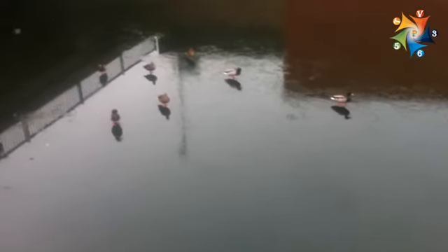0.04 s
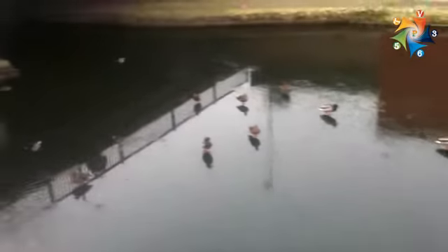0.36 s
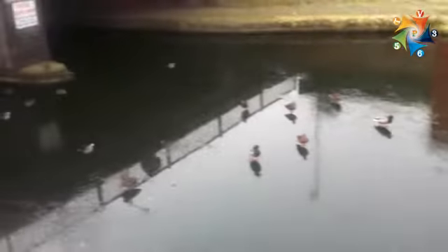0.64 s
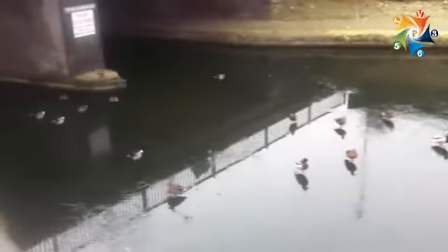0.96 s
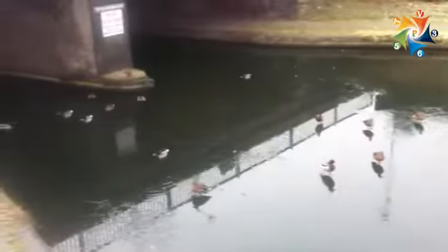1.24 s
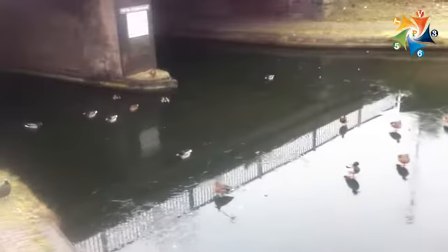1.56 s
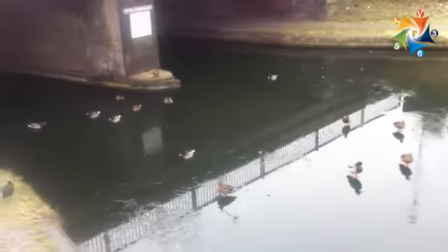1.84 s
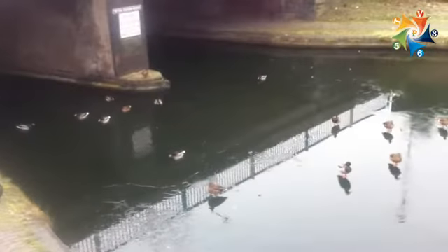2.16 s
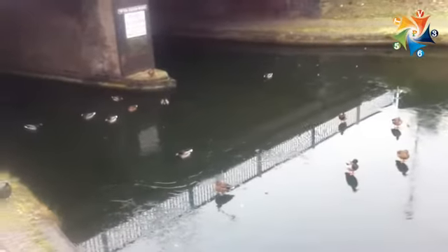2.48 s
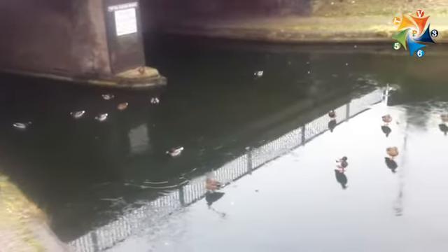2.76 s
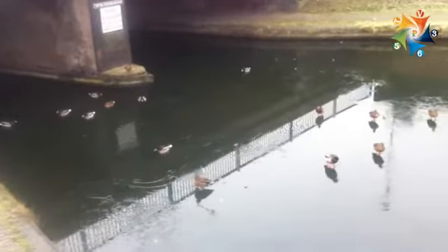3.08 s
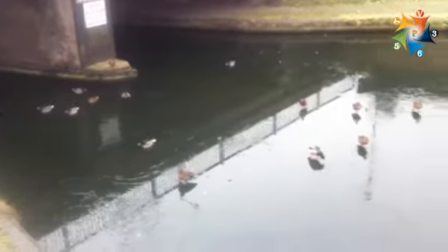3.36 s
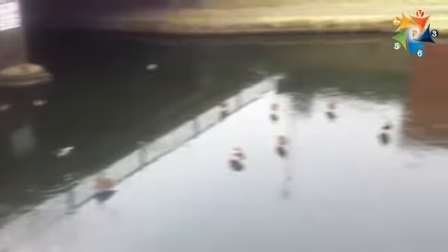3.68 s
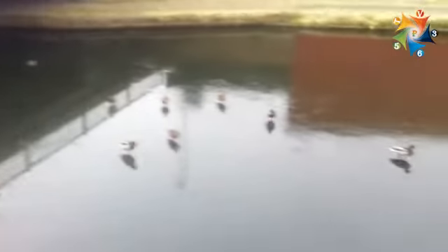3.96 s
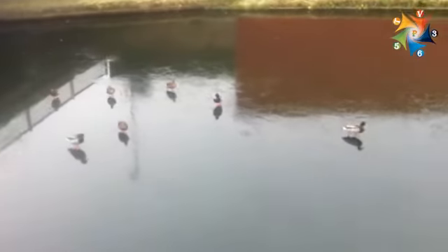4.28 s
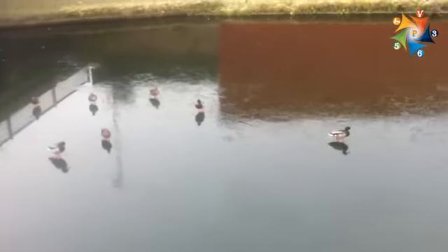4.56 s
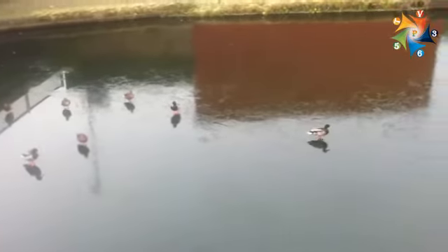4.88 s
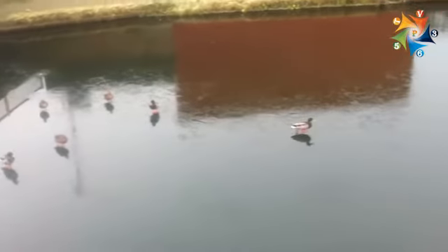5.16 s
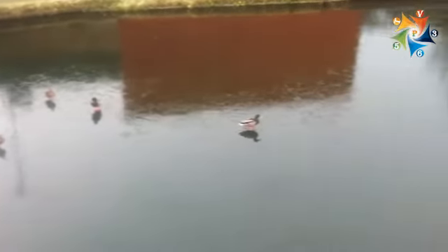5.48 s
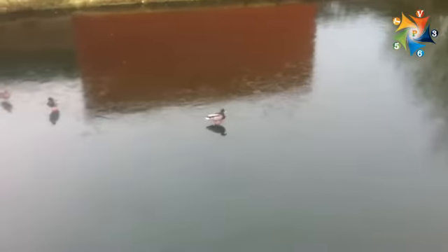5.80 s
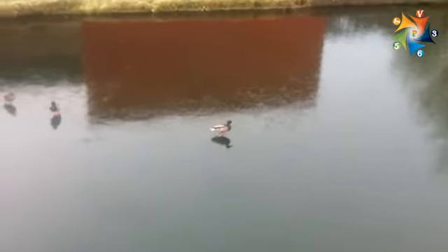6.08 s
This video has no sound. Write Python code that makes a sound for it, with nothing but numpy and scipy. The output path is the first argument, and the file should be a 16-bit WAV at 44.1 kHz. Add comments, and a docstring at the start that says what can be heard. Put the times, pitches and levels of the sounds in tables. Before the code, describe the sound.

A duck quacks briefly five times across a pond, all in the second half, while gusty wind rumbles and thumps on the microphone. Before that comes a short bright rustle with dry clicks, followed by the first soft gusts. Faint high chirps of small birds and the low, steady hum of a far-off town lie underneath. The wind eases for a moment, then buffets again at the end.

```python
"""A duck pond in a gusty breeze. Far-off town noise and moving air make a steady wash, and wind
bumps the microphone in soft, low thumps. A bright, crackly rustle with dry ticks fills the first
second, then sinks to a faint hiss. Small birds chip and twitter faintly. In the second half a duck
gives five short, nasal quacks: pulses from its voice box, shaped by its throat and bill."""
import sys
import numpy as np
from scipy import signal
from scipy.fft import rfft, irfft, next_fast_len
from scipy.io import wavfile
from scipy.ndimage import uniform_filter1d

SR = 44100
rng = np.random.default_rng(int(sys.argv[2]) if len(sys.argv) > 2 else 0)


def to_wav(s):
    """Save 16-bit WAV."""
    ch = np.atleast_2d(s).T  # columns
    pcm = np.round(np.clip(ch, -1, 1) * 32767)  # PCM
    wavfile.write(sys.argv[1], SR, pcm.astype(np.int16))


N = 279285
TIME = np.arange(N) / SR


def gain_of(db):
    """Turns decibels into a number to multiply a sound by."""
    return 10 ** (np.asarray(db) / 20)


def evened(x):
    """Scales a signal to an average strength (rms) of 1."""
    return x / np.sqrt(np.mean(x ** 2) + 1e-20)


def gain_at(colour, hz):
    """Looks up the gain at hz in a colour: a table of how strong each frequency is."""
    table_hz, db = np.transpose(colour)
    return gain_of(np.interp(np.log(hz + 1), np.log(table_hz + 1), db))


def follow(rows, t):
    """Reads a table at the times t, sliding from row to row."""
    time_s, *columns = np.transpose(rows)
    return [np.interp(t, time_s, column) for column in columns]


def coloured(x, colour):
    """Filters x with a colour; the result has strength 1."""
    size = next_fast_len(len(x))
    spectrum = rfft(x, size) * gain_at(colour, np.fft.rfftfreq(size, 1 / SR))
    return evened(irfft(spectrum, size)[:len(x)])


def noise(colour, size=N):
    """Noise of the given colour, at strength 1."""
    return coloured(rng.standard_normal(size), colour)


def flutter(hz, size=N):
    """A random wobble that changes about hz times a second."""
    return evened(np.interp(TIME[:size] * hz, np.arange(size), rng.standard_normal(size)))


def flare(t, rise_s, fall_s):
    """Grows to 1 at t = 0, then dies away."""
    return np.exp(-np.maximum(-t / rise_s, t / fall_s))


def add(mix, start_s, sound):
    """Mixes a sound in at start_s."""
    part = mix[max(round(start_s * SR), 0):][:len(sound)]
    part += sound[:len(part)]


# The tone of far-off traffic: frequency_hz, level_db
TRAFFIC_COLOUR = [(20, -55), (60, -34), (110, -8.5), (160, 0.5), (220, 1.5), (330, -6.5), (450, -15.5),
                  (1000, -25), (3000, -75.5)]
def traffic(level_db=-46.5):
    """Traffic in the town blurs into one low, steady rumble."""
    return gain_of(level_db) * noise(TRAFFIC_COLOUR)


# How loud the wash is and how high it reaches: time_s, level_db, upper_edge_hz
WASH_CURVE = [(0, -47.5, 2340), (.5, -44.5, 2530), (2.2, -43.5, 2390), (2.7, -42.5, 2500), (3.7, -43, 2500),
              (4.0, -38.5, 2820), (4.35, -39, 2850), (5.05, -45.5, 3070), (5.6, -44, 3160),
              (6.33, -38, 3400)]
# The tone of the wash before its top is cut off: frequency_hz, level_db
WASH_COLOUR = [(60, -29), (250, -8), (480, 1.5), (630, 6), (900, 4.5), (1200, 3), (1700, 4.5), (2200, -0.5),
               (3000, -5), (6000, -2)]
def distant_wash(patchy_db=1.2):
    """Far noise of town and air that slowly grows brighter toward the end."""
    hz, t, spectra = signal.stft(rng.standard_normal(N), SR, nperseg=1024, noverlap=768)
    _, edge_hz = follow(WASH_CURVE, t)
    tone = gain_at(WASH_COLOUR, hz)[:, None] / np.sqrt(1 + (hz[:, None] / edge_hz) ** 14)
    # random louder and softer patches, smoothed over pitch and then over time
    patches = uniform_filter1d(rng.standard_normal(spectra.shape), size=7, axis=0)
    patches = evened(uniform_filter1d(patches, size=14, axis=1))
    _, air = signal.istft(spectra * tone * gain_of(patchy_db * patches), nperseg=1024, noverlap=768)
    level_db, _ = follow(WASH_CURVE, TIME)
    return gain_of(level_db) * evened(air[:N])


# The tone of the light breeze: frequency_hz, level_db
BREEZE_COLOUR = [(20, -30), (45, -18.5), (80, -11.5), (135, -2), (200, -4.5), (350, -23), (1000, -48),
                 (3000, -80)]
def breeze(start_s=0.91, rise_s=0.16, level_db=-46.5, waver_db=2.4):
    """Slow air turns over slowly: a faint, wavering rumble, deeper than the gusts."""
    fade_in = np.clip((TIME - start_s) / rise_s, 0, 1)
    return fade_in * gain_of(level_db + waver_db * flutter(hz=12)) * noise(BREEZE_COLOUR)


# How loud the rustle is, apart from its one swish: time_s, level_db
RUSTLE_CURVE = [(0, -49.5), (.06, -44.5), (1.03, -46), (1.11, -51), (2.0, -56.5), (5.0, -57), (6.0, -52),
                (6.33, -48.5)]
# The tone of its hiss: frequency_hz, level_db
HISS_COLOUR = [(60, -21), (250, 16.5), (1000, 6.5), (2500, 6.5), (3500, 6), (4600, 3.5), (5700, 2),
               (6900, -2), (8800, -0.5), (10700, -1.5), (13000, -6), (16000, -8.5)]
def rustle(swish_at_s=4.17, swish_db=6, flicker_db=0.77, snaps_per_s=30, snap_decay_s=0.0013):
    """Bright hiss with tiny snaps at four pitches; the louder it is, the more it crackles."""
    level_db, = follow(RUSTLE_CURVE, TIME)
    level_db += swish_db * flare(TIME - swish_at_s, rise_s=0.037, fall_s=0.11)
    hiss = noise(HISS_COLOUR) * gain_of(flicker_db * flutter(hz=60))
    crackle = np.zeros(N)
    for hz in (3500, 5200, 7500, 10500):
        snaps = rng.uniform(0, 1, N) * (rng.random(N) < snaps_per_s / SR)
        bursts = signal.lfilter([1], [1, -np.exp(-1 / (snap_decay_s * SR))], snaps)
        crackle += bursts * noise([(hz / 2, -20), (hz, 0), (hz * 2, -20)])
    crackle_share = gain_of(-11 + 0.98 * (level_db - level_db.max()))
    return gain_of(level_db) * (hiss + crackle_share * evened(crackle))


# Dry ticks, then fainter high ones: start_s, peak_db
DRY_TICKS = [(0.042, -34), (.055, -43), (.209, -30.5), (.303, -30.5), (0.3518, -35), (.371, -29),
             (0.435, -39), (.447, -34), (0.5275, -29.5), (.536, -36), (.564, -36), (0.625, -25),
             (0.6363, -26.5), (.768, -34), (0.9783, -33.5), (1.015, -34), (3.052, -37), (4.175, -34)]
HIGH_TICKS = [(1.7394, -41.5), (1.7659, -44), (1.8527, -40.5), (4.6623, -41), (5.1831, -49.5),
              (5.3293, -41)]
# The tone of each kind: frequency_hz, level_db
DRY_COLOUR = [(300, -38), (1500, -2.5), (2700, -1), (4200, -8), (5600, -7), (7500, -16), (10500, -6.5),
              (13000, -32), (16000, -24)]
HIGH_COLOUR = [(3000, -14), (8000, -6), (11000, 0), (13000, -11), (16000, -11)]
def ticks(dry_decay_s=0.0038, high_decay_s=0.0018):
    """Each tick is a puff of noise that dies within milliseconds."""
    t, out = TIME[:SR // 20], np.zeros(N)
    kinds = (DRY_TICKS, DRY_COLOUR, dry_decay_s), (HIGH_TICKS, HIGH_COLOUR, high_decay_s)
    for rows, colour, decay_s in kinds:
        for start_s, peak_db in rows:
            tick = noise(colour, len(t)) * np.exp(-t / decay_s)
            add(out, start_s, gain_of(peak_db) * tick / abs(tick).max())
    return out


# Gusts, with short hard ones riding on long soft ones: start_s, length_s, level_db
GUSTS = [(1.194, 0.068, -31), (1.3, 0.021, -37.5), (2.026, 0.095, -32), (2.417, 0.914, -35.5),
         (2.478, 0.024, -28.5), (2.546, 0.1, -25.5), (2.69, 0.016, -28), (2.725, 0.14, -27),
         (2.967, 0.12, -21), (3.007, 0.061, -19.5), (3.165, 0.078, -26.5), (3.436, 0.034, -23),
         (3.568, 0.17, -27.5), (3.782, 0.12, -27), (3.997, 0.711, -32), (4.026, 0.11, -22.5),
         (4.285, 0.021, -23.5), (4.512, 0.036, -24), (4.9, 0.113, -40), (5.129, 0.1, -35.5),
         (5.646, 0.032, -37), (5.777, 0.031, -37.5), (5.844, 0.071, -24.5), (6.116, 0.32, -31.5)]
def wind_strength_db(hard_eddies, calm_db=-68, attack_s=0.0096, release_s=0.016, wake_db=-15):
    """Gusts rise fast, hold and fade; each hard eddy (a swirl of air) drags a short wake."""
    power = gain_of(calm_db) ** 2
    for start_s, length_s, level_db in GUSTS:
        attack = np.clip((TIME - start_s) / attack_s, 0, 1)
        release = np.exp(-np.maximum(TIME - start_s - length_s, 0) / release_s)
        power = power + (gain_of(level_db) * attack * release) ** 2
    t = TIME[:SR // 5] - .1
    wake = flare(t, rise_s=0.008, fall_s=0.014)
    for time_s, peak_db, _ in hard_eddies:
        add(power, time_s + t[0], (gain_of(peak_db + wake_db) * wake) ** 2)
    return 10 * np.log10(power)


# The tones of soft wind and of hard gusts: frequency_hz, level_db
SOFT_COLOUR = [(20, -60), (45, -45), (80, -8.5), (125, -2), (175, 1.5), (250, -2), (400, -14.5), (600, -24),
               (1000, -50), (2000, -38.5), (5000, -93)]
HARD_COLOUR = [(40, -50), (150, -23), (400, 9.5), (950, -4.5), (1400, -13), (2500, -41.5), (6000, -50)]
def turbulence(wind_db, hard_at_db=-15, lumpy_db=2, mic_low_cut_hz=84.5):
    """Low churning air on the microphone; only the strongest gusts reach higher in pitch."""
    hard_share = gain_of(-6 + 1.67 * np.minimum(wind_db - hard_at_db, 0))
    churn = noise(SOFT_COLOUR) + hard_share * noise(HARD_COLOUR)
    # even out the churn, so that the gusts set its rise and fall
    power = abs(uniform_filter1d(churn ** 2, size=900)) + 1e-6
    gusting = gain_of(wind_db + lumpy_db * flutter(hz=90)) * evened(churn / power ** .4)
    low_cut = signal.butter(2, mic_low_cut_hz, "high", fs=SR, output="sos")
    return signal.sosfiltfilt(low_cut, gusting)


def small_eddies(wind_db, per_s=12, over_wind_db=3.5, scatter_db=2, scatter_octaves=0.27):
    """Rows for weaker eddies that come by chance, peaking just over the wind that carries them."""
    at = np.flatnonzero(rng.random(N) < per_s / SR)
    strength, pitch = rng.standard_normal((N, 2))[at].T
    peak_db = wind_db[at] + over_wind_db + scatter_db * strength
    pitch_hz = 250 * 2 ** (scatter_octaves * pitch)
    return list(zip(TIME[at], peak_db, pitch_hz))


def eddy_thumps(rows, low_cut_hz=155, size=4096):
    """An eddy pushes, then sucks; with its deep bass cut off it swings two or three times."""
    hz = np.fft.rfftfreq(size, 1 / SR)
    low_cut = 1 / np.sqrt(1 + (low_cut_hz / (hz + 1)) ** 10)
    out = np.zeros(N)
    for time_s, peak_db, pitch_hz in rows:
        reach_hz = max(2.22 * (pitch_hz - 110), 40)  # small eddies pass faster and reach higher
        spectrum = low_cut * np.exp(-(hz / reach_hz) ** 1.75)
        swing = np.fft.fftshift(irfft(1j * spectrum))  # 1j turns a bump into a push and a pull
        add(out, time_s - size / 2 / SR, gain_of(peak_db) * swing / abs(swing).max())
    return out


# The hardest swirls of air that hit the microphone: time_s, peak_db, rough_pitch_hz
HARD_EDDIES = [(1.906, -24, 207), (2.043, -10, 324), (2.082, -15.5, 190), (2.519, -15, 220),
               (2.554, -14.5, 260), (2.565, -18, 300), (2.575, -18, 328), (2.611, -15, 216),
               (2.802, -19.5, 397), (2.85, -21, 190), (2.887, -15.5, 454), (2.894, -8, 290),
               (2.939, -21, 318), (2.982, -15, 318), (3.026, -18, 430), (3.039, -9, 275),
               (3.047, -8.5, 420), (3.058, -6.5, 250), (3.062, -17, 620), (3.086, -8, 320),
               (3.238, -14.5, 236), (3.29, -16.5, 257), (3.371, -17.5, 260), (3.606, -12.5, 298),
               (3.612, -12.5, 286), (3.655, -12.5, 285), (3.709, -12.5, 205), (3.803, -15.5, 265),
               (3.814, -13.5, 323), (3.825, -11.5, 350), (3.858, -15, 260), (3.885, -16.5, 322),
               (3.901, -19, 250), (4.053, -17, 200), (4.113, -11.5, 247), (4.124, -11, 240),
               (4.198, -8.5, 310), (4.205, -14, 440), (4.298, -9, 230), (4.313, -13.5, 283),
               (4.363, -18, 285), (4.401, -24, 310), (4.431, -20.5, 390), (4.458, -10.5, 248),
               (4.491, -20, 310), (4.525, -13, 216), (4.542, -17, 225), (4.633, -11, 298),
               (4.688, -22.5, 270), (5.233, -25, 224), (5.855, -8.5, 285), (5.883, -7.5, 214),
               (6.094, -12, 250), (6.122, -5.5, 236), (6.157, -13.5, 234), (6.2, -11.5, 213),
               (6.211, -9, 212), (6.245, -11, 237), (6.254, -11, 219), (6.286, -9, 255), (6.316, -3, 300)]
def wind():
    """Gusts churn over the microphone while eddies thump against it."""
    wind_db = wind_strength_db(HARD_EDDIES)
    return turbulence(wind_db) + eddy_thumps(HARD_EDDIES + small_eddies(wind_db))


def far_flock(per_s=22, length_s=0.0165, fuzz=0.64, scatter_octaves=0.0705):
    """Rows like those of CHIPS below, for a far-off flock that twitters by chance."""
    starts_s = TIME[rng.random(N) < per_s / SR]
    scatter_db, pitch = rng.standard_normal((N, 2))[:len(starts_s)].T
    end_hz = 5650 * 2 ** (scatter_octaves * pitch)
    return [(start_s, db, hz * 1.122, hz, length_s, fuzz)
            for start_s, db, hz in zip(starts_s, -63 + scatter_db, end_hz)]


# Thin calls of small birds: start_s, peak_db, start_hz, end_hz, length_s, fuzz (0 to 1)
CHIPS = [(.142, -47, 7400, 5500, .01, .5), (1.366, -50, 4500, 3700, .012, .8),
         (1.473, -50, 4660, 3960, 0.022, 0.8), (1.543, -51, 4000, 3570, 0.023, 0.5),
         (1.581, -53, 6800, 5560, .014, 0.7), (1.814, -54, 8300, 6400, .01, .7),
         (1.846, -52, 7170, 5880, .012, 0.69), (2.072, -52, 6900, 5540, .013, 0.76),
         (2.493, -51, 6430, 5300, 0.01, .6), (3.039, -51, 10500, 7500, .007, .4),
         (3.044, -44, 9740, 5250, 0.011, 0.6), (3.069, -51, 6600, 6000, .007, .3),
         (3.25, -54, 10000, 8900, 0.0071, .3), (3.347, -52, 6400, 5500, .009, .6),
         (4.048, -55, 9300, 7500, .008, .4), (4.07, -55, 7300, 6200, .008, .3),
         (4.128, -48, 8250, 5600, 0.012, 0.3), (5.035, -57, 7200, 6660, 0.0406, 0.5)]
def small_birds():
    """Each chip is a tiny, unsteady whistle that drops fast and levels out."""
    out = np.zeros(N)
    for start_s, peak_db, start_hz, end_hz, length_s, fuzz in CHIPS + far_flock():
        progress = np.linspace(0, 1, round(length_s * SR))
        hz = end_hz + (start_hz - end_hz) * (1 - progress) ** 1.61
        hz *= 1 + .13 * fuzz * flutter(hz=3000, size=len(hz))
        whistle = np.sin(2 * np.pi * np.cumsum(hz) / SR)
        add(out, start_s, gain_of(peak_db) * np.sin(np.pi * progress) * whistle)
    return out


# The tones of the duck's throat and of its raspy breath: frequency_hz, level_db
THROAT_COLOUR = [(720, 5), (1440, 4), (2160, -8), (2880, -10.5), (4300, -16), (5000, -18.5), (5700, -24),
                 (7200, -24), (8500, -23.5), (10000, -31), (15000, -41)]
BREATH_COLOUR = [(400, -20), (1500, 3), (3800, -3), (5500, -11.5), (7000, -14), (8600, -4.5), (12000, -11),
                 (16000, -20)]
def quack(length_s, pitch_hz, rise, level_db, bill_hz, bill_boost_db, nasal_db, rasp):
    """A short run of voice-box pulses rings in the throat and bill; hoarse calls waver more."""
    bill_width_octaves, shimmer_db, breath_db = .42, 2.5, -8
    position = np.linspace(-1, 1, round(length_s * SR))  # -1 at the start, 1 at the end
    size = len(position)
    arch = .012 * (1 / 3 - position ** 2)
    jitter = .04 * rasp * flutter(hz=540)[:size]
    phase = 2 * np.pi * np.cumsum(pitch_hz * (1 + rise * position / 2 + arch + jitter)) / SR
    harmonic = np.arange(1, 21)[:, None]  # whole multiples of the pitch
    octaves_from_bill = np.log2(harmonic * pitch_hz / bill_hz)
    bill_db = bill_boost_db * np.exp(-.5 * (octaves_from_bill / bill_width_octaves) ** 2)
    boost_db = bill_db + nasal_db * (harmonic == 2)
    start_phase, drift = rng.uniform(0, 2 * np.pi, (2, len(harmonic), 1))
    shift_db = shimmer_db * np.sin(np.pi * position + drift)  # the moving bill shifts the tone
    weights = gain_at(THROAT_COLOUR, harmonic * pitch_hz) * gain_of(boost_db + shift_db)
    voice = evened((weights * np.cos(harmonic * phase + start_phase)).sum(0))
    voice *= 1 + .5 * rasp * flutter(hz=410)[:size]  # a hoarse call has uneven pulses
    breath = coloured(rng.standard_normal(size) * (1 + np.cos(phase)), BREATH_COLOUR)  # a puff a pulse
    breath *= gain_of(breath_db) * rasp * (1 - position / 2)  # most at the start
    return gain_of(level_db) * (voice + breath) * (1 - position ** 4)


# The duck's calls: start_s, length_s, pitch_hz, rise (share of the pitch), level_db,
# bill_hz, bill_boost_db, nasal_db, rasp (0 to 1)
QUACKS = [(3.740, .029, 718, .012, -32.5, 4100, 8, 3, .16),
          (4.722, .037, 709, .012, -36, 6200, 11.5, -5, .08),
          (5.396, .027, 720, .008, -32, 5000, 3.5, -1, .13),
          (6.109, .04, 730, .045, -30, 2250, 10, 1.5, .42), (6.147, .055, 706, .055, -33, 2000, 6, -1, .42)]
def duck():
    """Five quacks across the water; the last two run together."""
    out = np.zeros(N)
    for start_s, *call in QUACKS:
        add(out, start_s, quack(*call))
    return out


def bank_echoes(sound, delay_s=.012, fade_s=.35, level_db=-16):
    """Faint, scattered echoes from the banks and the bridge."""
    t = TIME[:SR // 2]
    echoes = rng.standard_normal(len(t)) * (rng.random(len(t)) < 1 / 20)
    echoes *= (t > delay_s) * gain_of(-60 * t / fade_s)
    return gain_of(level_db) * signal.fftconvolve(sound, echoes / np.linalg.norm(echoes))[:N]


def scene():
    """Everything that reaches the one microphone; only the birds echo."""
    background = traffic() + distant_wash() + breeze() + rustle() + ticks() + wind()
    birds = small_birds() + duck()
    return (background + birds + bank_echoes(birds))[None]


def record(dry, top_hz=15700):
    """Cuts off the very highest treble."""
    low_pass = signal.firwin(511, top_hz, window=("kaiser", 9), fs=SR)
    return signal.oaconvolve(dry, low_pass[None], "same")


dry = scene()
out = record(dry)
to_wav(out)
```